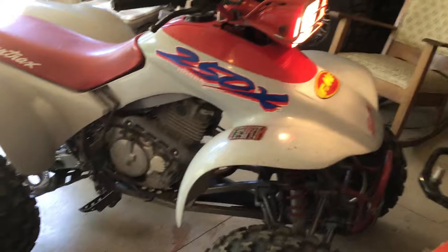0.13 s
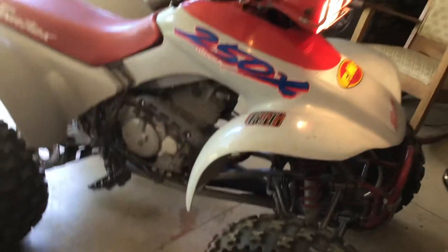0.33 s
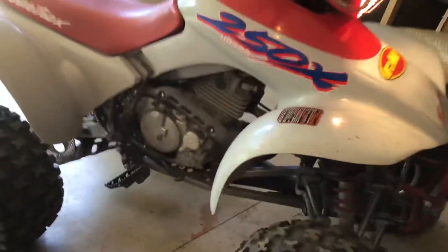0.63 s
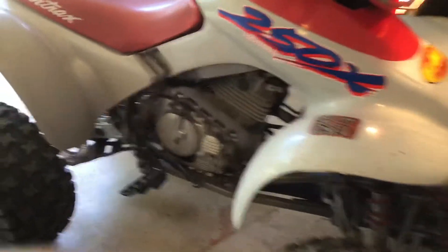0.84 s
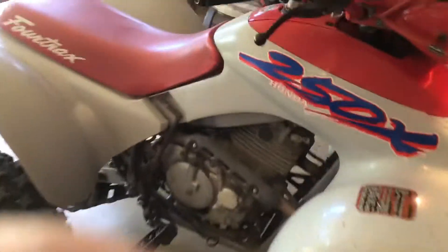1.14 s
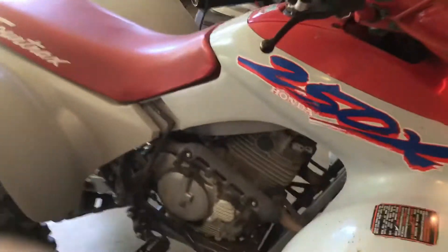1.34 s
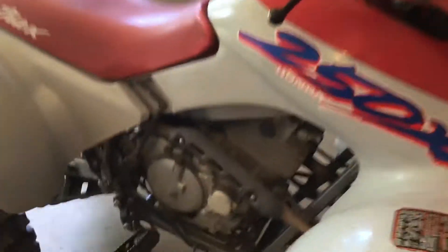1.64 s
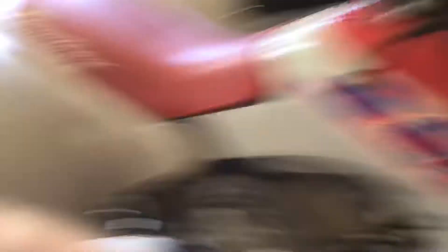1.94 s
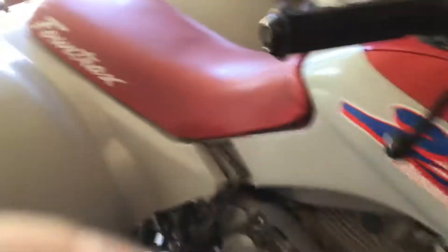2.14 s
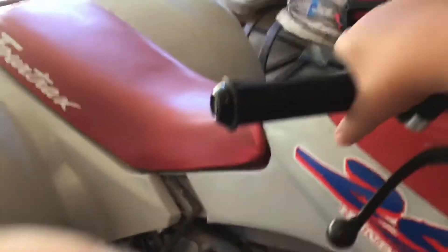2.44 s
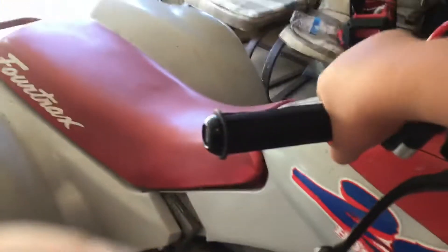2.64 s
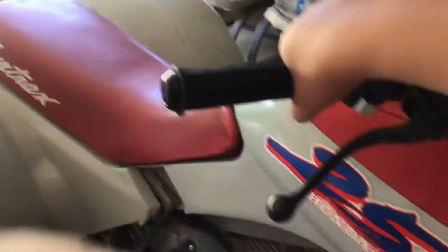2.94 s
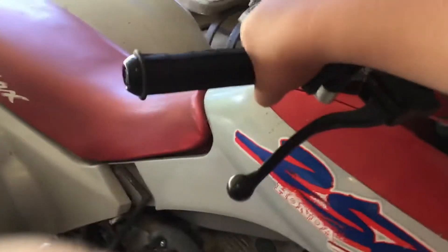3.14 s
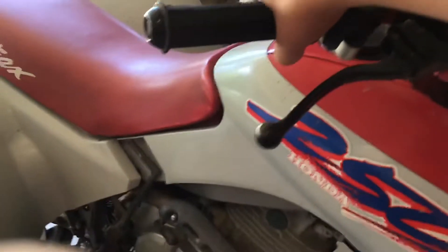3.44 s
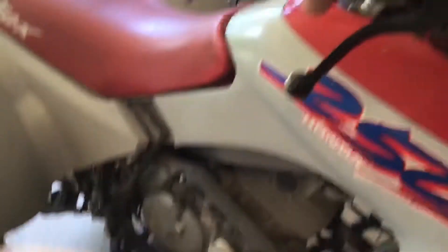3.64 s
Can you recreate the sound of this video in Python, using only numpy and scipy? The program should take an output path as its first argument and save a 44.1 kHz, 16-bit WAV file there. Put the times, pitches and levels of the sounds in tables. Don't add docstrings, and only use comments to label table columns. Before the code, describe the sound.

Small single-cylinder quad engine putters and ticks steadily in a garage, then revs up twice

```python
import sys
import numpy as np
from scipy import signal
from scipy.fft import rfft, irfft, next_fast_len
from scipy.io import wavfile
from scipy.ndimage import uniform_filter1d

SR = 44100
rng = np.random.default_rng(int(sys.argv[2]) if len(sys.argv) > 2 else 0)


def ratio(d):
    e = np.asarray(d, float) / 20
    return 10 ** e


def to_wav(sig):
    pcm = np.clip(np.atleast_2d(sig), -1, 1) * 32767
    pcm = np.round(pcm).astype(np.int16)
    wavfile.write(sys.argv[1], SR, pcm.T)


N = 167580

# (time [s], rate [firings/s])
FIRING_RATE = [(0, 15.68), (.7, 15.73), (1.3, 15.34), (2, 15.21), (2.4, 15.41), (2.74, 15.39),
               (2.82, 19.93), (2.95, 26.22), (3.02, 25.39), (3.15, 26.41), (3.25, 30.73), (3.36, 36),
               (3.43, 37.5), (3.5, 35.9), (3.65, 32.39), (3.8, 29.06)]
# (time [s], exhaust bark [dB], low thump [dB], combustion knock [dB], clatter [dB])
SOURCE_LEVELS = [(0, -24, -30, -28.5, -22), (.6, -23.5, -33.5, -29.5, -21), (1.2, -25, -30.5, -30, -20),
                 (1.6, -23.5, -29.5, -26, -20.5), (2.1, -20.5, -29.5, -28.5, -20.5),
                 (2.72, -21.5, -32.5, -25, -20.5), (2.76, -18.5, -28, -16, -21.5),
                 (2.82, -16, -24, -16, -17.5), (2.91, -14, -25, -19.5, -15.5), (2.96, -11.5, -25, -23, -18),
                 (3.14, -17.5, -23, -27.5, -20.5), (3.2, -12, -23, -17, -17.5),
                 (3.3, -9.5, -28.5, -19.5, -15), (3.38, -12, -25, -31, -14.5), (3.48, -12, -20, -40, -15.5),
                 (3.65, -12.5, -28, -31, -17), (3.8, -15, -18.5, -28, -17.5)]
# (time [s], share [0-1])
INTAKE_SHARE = [(0, .8), (1.1, .75), (1.6, .2), (2.7, .15), (3, .1), (3.8, .15)]
# (time [s], opening [0-1])
THROTTLE_OPENING = [
    (0, 0.2),
    (2.74, 0.11),
    (2.9, .9),
    (3.05, 0.85),
    (3.15, 0.53),
    (3.25, 1),
    (3.42, .99),
    (3.52, 0.7),
    (3.8, 0.5),
]
# (time [s], peak [dB])
LOW_THUDS = [
    (2.876, -26),
    (3.256, -27),
    (3.316, -20),
    (3.567, -20),
    (3.597, -23),
]
# (centre [Hz], width [Hz], level [dB])
SILENCER_MODES = [(172, 20, -4), (198, 24, -7), (245, 22, -8), (274, 16, -4), (294, 42, 0), (322, 20, -5),
                  (395, 28, -14)]
# (centre [Hz], width [Hz], level [dB])
BLOCK_MODES = [(648, 170, 8), (1145, 62, 12), (1284, 50, 5), (1577, 46, 6.5), (1842, 16.5, 0.5),
               (2215, 43, 10.5), (2533, 24, 6), (2827, 75, 12.5), (3120, 27, 1.5), (3600, 27, 8.5),
               (3873, 49, 3), (4155, 44, 10), (4970, 150, -4.5), (3345, 40, 11)]
# (frequency [Hz], density [dB/Hz])
THUMP_IDLE = [(45, -43), (62, -26), (78, -2.5), (92, 1.5), (125, 2.5), (140, -48), (160, -33), (200, -63)]
# (frequency [Hz], density [dB/Hz])
THUMP_SPEED = [(50, -32), (75, -31), (110, -17), (130, -4.5), (152, -2), (175, -7), (210, -45), (260, -54)]
# (frequency [Hz], density [dB/Hz])
CLATTER_IDLE = [(210, -29), (350, -13), (451, -14.5), (1130, -9.5), (1660, -4.5), (2840, -4), (5030, -6),
                (11800, -30), (15500, -29)]
# (frequency [Hz], density [dB/Hz])
CLATTER_SPEED = [(260, -34), (450, -9.5), (614, -19), (972, -9), (1110, -5), (2260, -5), (2820, -3),
                 (3130, -1), (15500, -29)]
# (frequency [Hz], density [dB/Hz])
KNOCK_BODY = [(400, -11), (1500, -6.5), (2500, 2), (4200, 5), (6500, -3.5), (10000, -21), (15500, -40)]
# (frequency [Hz], density [dB/Hz])
KNOCK_EDGE = [(4000, -30), (7000, -26), (10000, 7), (13000, -4.5), (15700, 0.5)]
# (frequency [Hz], t60 [s])
GARAGE_T60 = [(100, 1), (500, 0.42), (3000, 0.15), (12000, 0.36)]
# (frequency [Hz], gain [dB])
MIC_RESPONSE = [(4000, 0), (8200, 0), (9000, 0.5), (10300, -3), (11100, -1), (11900, -7), (13050, 0),
                (14200, -4)]

FIRE_JITTER_CYCLES, FIRE_SCATTER_DB = .006, 1.2
LOOSE_JITTER_CYCLES, LOOSE_SCATTER_DB = .03, 1.5
KNOCK_LEAD_CYCLES = .27


def unit(x):
    return x / np.sqrt(np.mean(x ** 2) + 1e-20)


def along(points, hz):
    f, v = np.transpose(points)
    return np.interp(np.log(hz + 1), np.log(f + 1), v)


def curves(rows):
    time_s, *columns = np.transpose(rows)
    return [np.interp(np.arange(N) / SR, time_s, column) for column in columns]


def pace():
    idle_rate, full_rate = 16, 34
    return np.clip((curves(FIRING_RATE)[0] - idle_rate) / (full_rate - idle_rate), 0, 1)


def filtered(x, response):
    m = next_fast_len(N + SR // 2)
    return irfft(rfft(x, m) * response(np.fft.rfftfreq(m, 1 / SR)), m)[:N]


def coloured(x, colour):
    return unit(filtered(x, lambda f: ratio(along(colour, f))))


def resonances(modes, f, turn=-1):
    total = 0
    for k, (centre, width, db) in enumerate(modes):
        damping = 1j * f * width
        total = total + turn ** k * ratio(db) * damping / (centre * centre - f * f + damping)
    return total


def pulses(lag_cycles, jitter_cycles, scatter_db, per_cycle=1):
    first_turn = .036
    turns = (np.cumsum(curves(FIRING_RATE)[0]) / SR + first_turn - lag_cycles) * per_cycle
    whole = np.arange(np.ceil(turns[0]), turns[-1])
    draw = rng.standard_normal((len(whole), 2))
    at = np.interp(whole + jitter_cycles * draw[:, 0], turns, np.arange(N)).astype(int)
    return np.bincount(at, ratio(scatter_db * draw[:, 1]), N)


def loose_pulses(lag_cycles):
    return pulses(lag_cycles, LOOSE_JITTER_CYCLES, LOOSE_SCATTER_DB)


def dying(x, t60_s, rise_s):
    t = np.arange(SR // 4) / SR
    return signal.fftconvolve(x, ratio(-60 * t / t60_s) * (1 - np.exp(-t / rise_s)))[:N]


def patchy(depth_db):
    z = signal.stft(rng.standard_normal(N), nperseg=512)[2]
    field = uniform_filter1d(rng.standard_normal(z.shape), size=4, axis=0)
    field = uniform_filter1d(field, size=16, axis=1)
    return unit(signal.istft(z * ratio(depth_db * unit(field)), nperseg=512)[1][:N])


def ringing(x, colour, ring):
    return unit(filtered(x, lambda f: ratio(along(colour, f)) * (1 + ring * resonances(BLOCK_MODES, f))))


def garage(x):
    hz, t, z = signal.stft(rng.standard_normal(SR // 2), SR, nperseg=256)
    decay = ratio(-60 * t / along(GARAGE_T60, hz)[:, None])
    tail = signal.istft(z * decay, SR, nperseg=256)[1]
    delayed = np.pad(x, (400, 0))
    return signal.fftconvolve(delayed, tail / np.linalg.norm(tail))[:N]


def thuds():
    time_s, peak_db = np.transpose(LOW_THUDS)
    hits = np.bincount((time_s * SR).astype(int), ratio(peak_db), N)
    return -dying(hits, t60_s=0.029, rise_s=.0015)


def clatter(level_db):
    ticks = dying(pulses(0.084, 0.29, 1, per_cycle=6), t60_s=0.048, rise_s=.0005)
    swell = dying(loose_pulses(-KNOCK_LEAD_CYCLES), t60_s=0.097, rise_s=0.018)
    shake = (0.52 * unit(ticks) + .5 * unit(swell) + 1.43) * patchy(depth_db=1.7)
    idle = ringing(shake, CLATTER_IDLE, ring=1.0)
    speed = ringing(shake, CLATTER_SPEED, ring=0.8)
    return ratio(level_db) * ((1 - pace()) * idle + pace() * speed)


def knock(level_db):
    edge_idle_db, edge_growth = -58, 1.6
    firing = pulses(-KNOCK_LEAD_CYCLES, FIRE_JITTER_CYCLES * 2, LOOSE_SCATTER_DB)
    gate = dying(firing, t60_s=.05, rise_s=.008)
    edge = coloured(gate * rng.standard_normal(N), KNOCK_EDGE)
    body = ringing(gate * patchy(depth_db=2.0), KNOCK_BODY, ring=0.76)
    edge_db = edge_idle_db + edge_growth * (level_db - level_db[0])
    return ratio(level_db) * body + ratio(edge_db) * edge


def silencer(f):
    modes = -resonances(SILENCER_MODES, f, turn=0.95) * np.exp(-1j * .6)
    return modes * f ** 4 / (f ** 4 + 140 ** 4) / (1 + (f / 420) ** 6)


def exhaust_bark(level_db):
    echo_s, intake_lag_cycles, valve_lead_cycles = .017, .42, .22
    fire = pulses(0, FIRE_JITTER_CYCLES, FIRE_SCATTER_DB)
    echo = np.roll(pulses(0, 2 * FIRE_JITTER_CYCLES, LOOSE_SCATTER_DB), int(echo_s * SR))
    echo = echo * (.7 - .5 * pace())
    valve = (.45 - .3 * pace()) * loose_pulses(-valve_lead_cycles)
    gulps = curves(INTAKE_SHARE)[0] * loose_pulses(intake_lag_cycles) + valve
    flow = unit(dying(loose_pulses(-0.084), t60_s=0.16, rise_s=0.0065)) + 0.47
    gas = flow * rng.standard_normal(N)
    clean = filtered(fire + echo - gulps, silencer) / np.sqrt(curves(FIRING_RATE)[0])
    rough = unit(filtered(gas, silencer))
    return ratio(level_db) * (unit(clean) + ratio(-5 - 8 * pace()) * rough)


def exhaust_thump(level_db):
    delay_s = .009
    throttle = np.clip(curves(THROTTLE_OPENING)[0], 0, 1)
    late = -np.roll(pulses(0, FIRE_JITTER_CYCLES / 2, FIRE_SCATTER_DB / 2), int(delay_s * SR))
    idle, speed = coloured(late, THUMP_IDLE), coloured(late, THUMP_SPEED)
    return ratio(level_db) * ((1 - throttle) * idle + throttle * speed)


def scene():
    bark_db, thump_db, knock_db, clatter_db = curves(SOURCE_LEVELS)
    metal = clatter(clatter_db) + knock(knock_db)
    bark, thump = exhaust_bark(bark_db), exhaust_thump(thump_db)
    to_walls = ratio(-9 - 3 * pace()) * bark + ratio(-12) * thump + ratio(-9) * metal
    return (bark + thump + metal + garage(to_walls))[None]


def top_cut(x):
    return signal.sosfilt(signal.butter(12, 15710, fs=SR, output="sos"), x)


def record(dry):
    start_s, top_hz, low_cut_hz = .0725, 15765, 45

    def microphone(f):
        return ratio(along(MIC_RESPONSE, f)) * (f < top_hz) * (1j * f / (1j * f + low_cut_hz)) ** 2

    x = filtered(dry[0], microphone) + thuds()
    x = x / (1 + np.abs(x) ** 8) ** (1 / 8)
    x = x * (np.arange(N) > start_s * SR)
    return top_cut(x[None])


dry = scene()
out = record(dry)
to_wav(out)
```